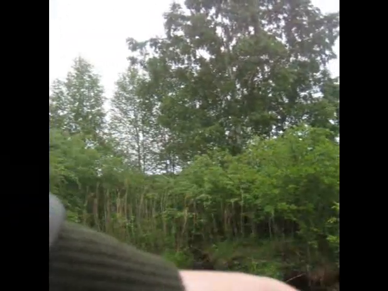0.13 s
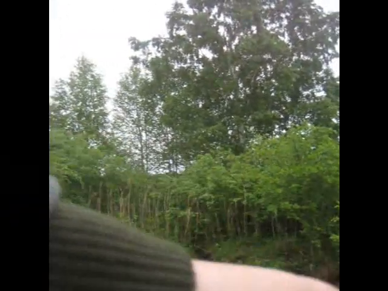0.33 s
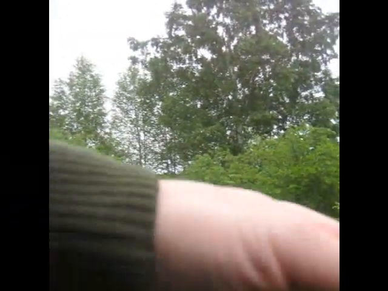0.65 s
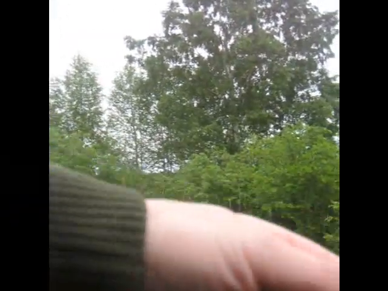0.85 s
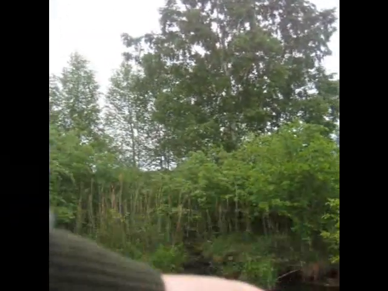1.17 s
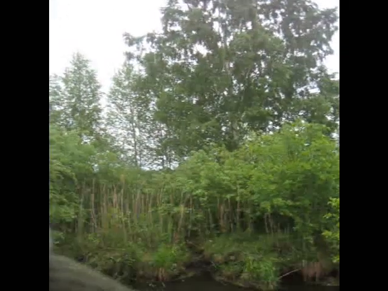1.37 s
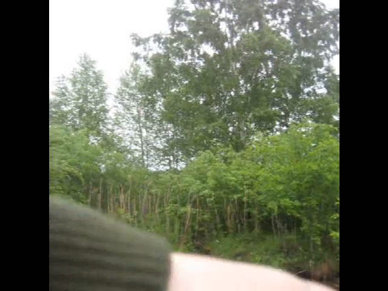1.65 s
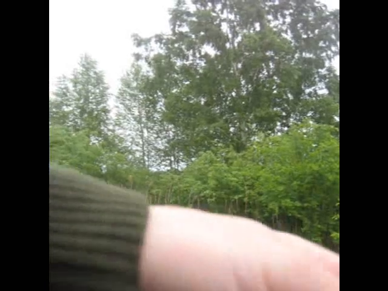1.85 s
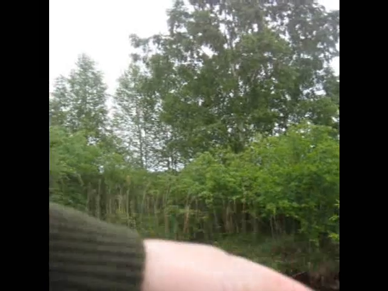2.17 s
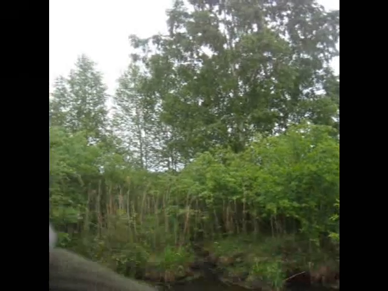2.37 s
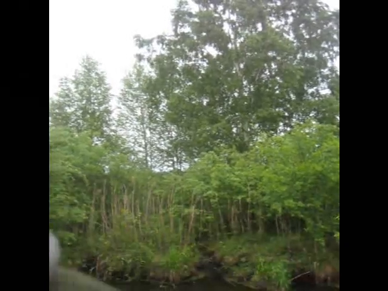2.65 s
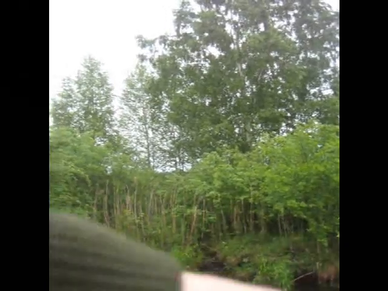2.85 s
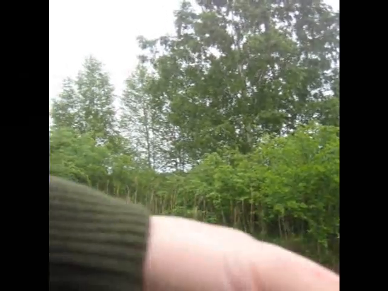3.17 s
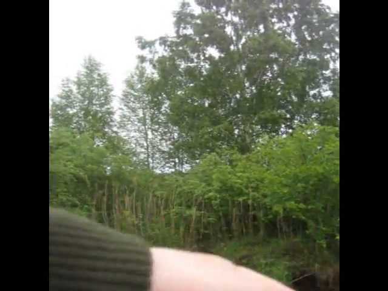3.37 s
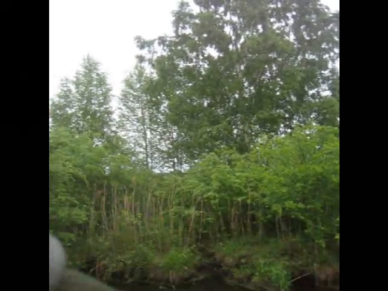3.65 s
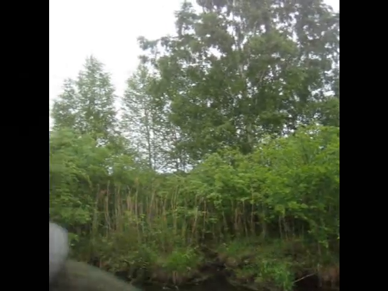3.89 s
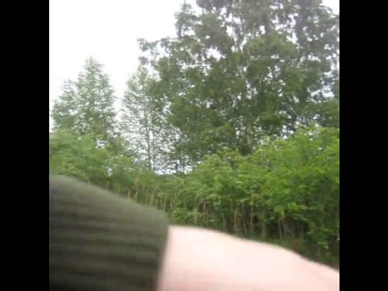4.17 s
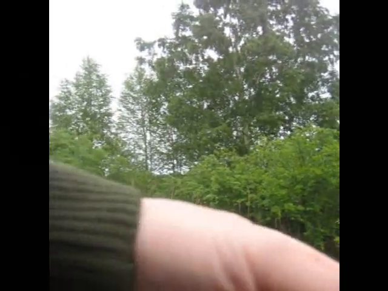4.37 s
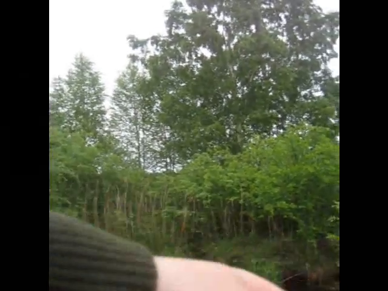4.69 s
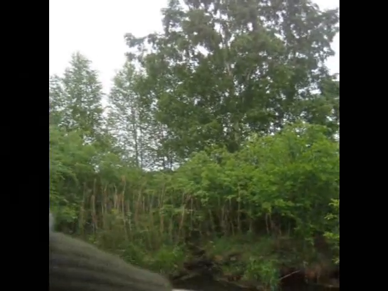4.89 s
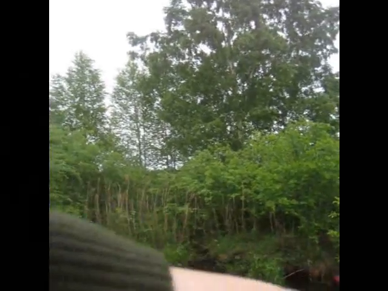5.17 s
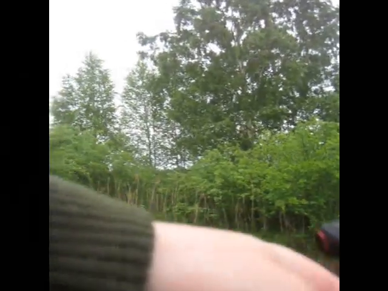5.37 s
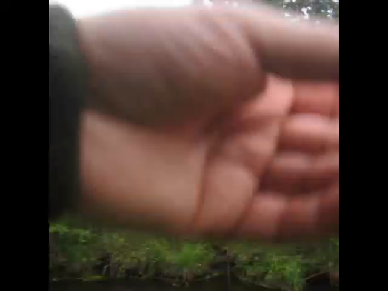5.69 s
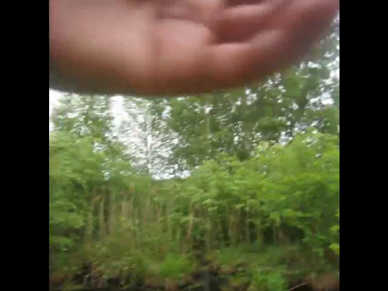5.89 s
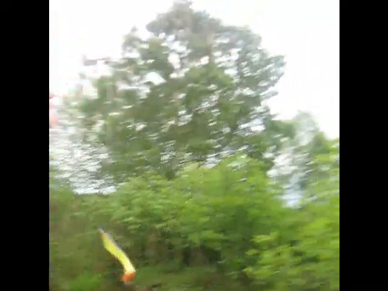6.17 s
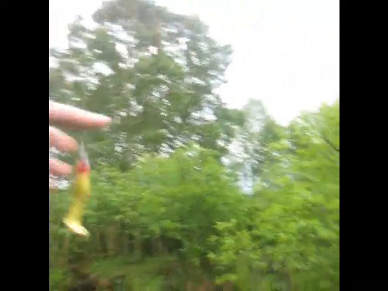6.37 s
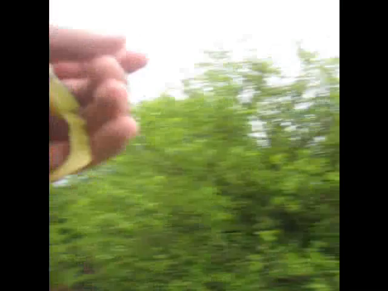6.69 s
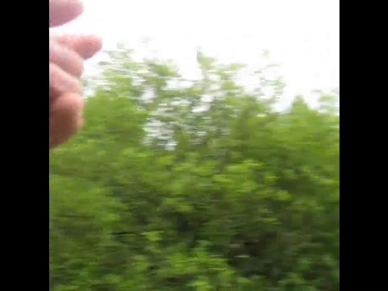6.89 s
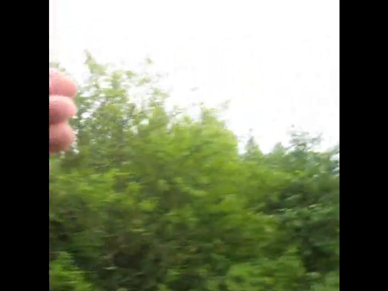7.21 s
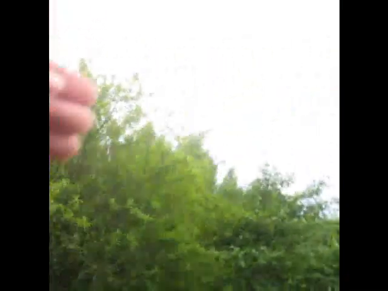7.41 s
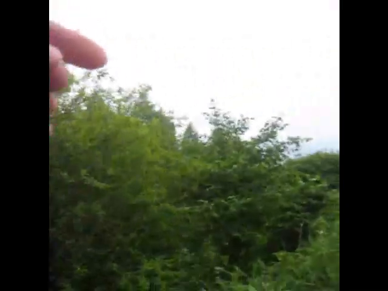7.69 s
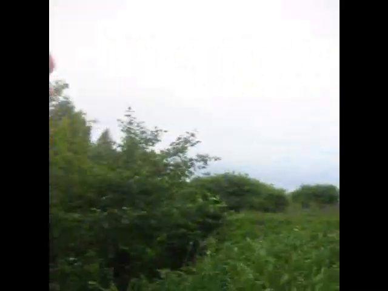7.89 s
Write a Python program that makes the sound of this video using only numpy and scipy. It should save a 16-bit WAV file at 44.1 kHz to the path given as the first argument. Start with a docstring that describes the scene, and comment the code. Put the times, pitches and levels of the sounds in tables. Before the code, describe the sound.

Wild songbirds whistle, buzz and trill over a marsh with faint hiss, then a sleeve and hands rub and knock the small camera.

```python
"""Songbirds whistle, buzz and trill around a marsh, and one long whistle falls slowly.
Far birds and hiss lie behind them; later, a sleeve and hands rub and knock the camera body.
Bird notes are tones that follow pitch curves, with noise-like echoes from the bushes.
Hiss, rubbing and leaves are filtered noise; knocks are short pushes that make the shell ring.
The small camera has one microphone, so both channels are the same."""
import sys
import numpy as np
from scipy import signal
from scipy.fft import rfft, irfft
from scipy.io import wavfile
from scipy.ndimage import uniform_filter1d

SR = 44100
rng = np.random.default_rng(int(sys.argv[2]) if len(sys.argv) > 2 else 0)


def file_out(sig):
    """Save sig as 16-bit WAV at sys.argv[1]."""
    # one column per channel
    cols = np.atleast_2d(sig).T
    # limit, then scale
    lim = np.clip(cols, -1, 1)
    pcm = np.round(lim * 32767).astype(np.int16)
    wavfile.write(sys.argv[1], SR, pcm)


N = 355005
T = np.arange(N) / SR  # time in seconds

# Note levels below are for the start of a note, before its fade, flutter and echoes.

# Steady hiss. Each row: frequency in Hz, relative strength per Hz in dB.
HISS_COLOUR = [(25, -8), (60, -2.5), (430, -1.5), (1450, -3), (3070, -3.5), (6340, -2.5), (8760, -11.5),
               (13000, -14), (14800, -12.5)]
HISS_DB = -45
# Thin whine of the camera electronics. Each row: frequency in Hz, level in dB.
WHINE_TONES = [(7560, -67)]

# Loudness of the far birds with their echoes. Each row: time in seconds, level in dB.
CHORUS_LEVEL = [(0, -44), (1.5, -43.5), (3.7, -47), (4.3, -52), (6.2, -50), (6.5, -51.5), (8.05, -41)]

# Echoes: a short one from the bushes and a longer, weaker one from the tree line.
BUSH_T60_S, BUSH_DB = 0.24, -6  # time to fade by 60 dB; level sent from the near birds
FAR_T60_S, FAR_DB = 1.1, -13  # time to fade by 60 dB; start level against the bush echo

# Cloth and skin sliding on the camera.
# Each row: time in seconds, scratch level in dB, body rumble level in dB.
RUB_LEVELS = [(5.5, -56, -68), (5.72, -52, -53.5), (6.27, -47, -48.5), (6.43, -37.5, -45), (6.55, -45, -49),
              (7.0, -46, -51.5), (7.1, -40, -45.5), (7.18, -42.5, -46), (7.23, -56, -57), (7.3, -34, -44),
              (7.36, -27, -37), (7.42, -31, -38.5), (7.47, -49, -45), (7.56, -41.5, -41.5),
              (7.655, -29, -46), (7.72, -36, -39), (7.8, -36, -40), (7.85, -44.5, -42), (7.96, -46, -47),
              (8.04, -36, -38)]
# Tone of the scratch. Each row: frequency in Hz, relative strength per Hz in dB.
SCRATCH_COLOUR = [(700, -10), (1300, -1.5), (2400, -1), (7300, -3.5), (15000, -18)]
# Tone of leaves brushing past. Each row: frequency in Hz, relative strength per Hz in dB.
LEAF_TONE = [(1100, -15), (1900, 5), (2600, -7), (4500, -19)]
LEAF_S, LEAF_LENGTH_S, LEAF_DB = 5.74, 0.28, -47  # start, length, level at the middle

# Blows on the camera. Each row: time of the push in seconds, height of the push in dB,
# contact time in ms, how freely the shell rings in dB.
KNOCK_BLOWS = [(4.515, -17.5, 0.04, -52), (5.533, -20, 0.027, -57), (5.897, -23, 0.032, -41),
               (6.7138, -8, .12, -58), (6.744, -10.5, .1, -58), (7.66, -41, 0.17, -7.5),
               (7.674, -35.5, 0.23, -17)]
# Ways the shell rings. Each row: frequency in Hz, strength in dB, time to fade by 60 dB in seconds.
SHELL_MODES = [(731, 5.5, 0.14), (806, 10.5, 0.088)]
REBOUND_HZ, REBOUND_T60_S = 356, 0.0091

# Pitch of the long whistle. One row: top in Hz, bottom in Hz, time constant of the fall in seconds.
LONG_WHISTLE_PITCH = (6960, 5275, .14)
# Loudness of the long whistle before its steady fade. Each row: time in seconds, level in dB.
LONG_WHISTLE_LEVEL = [(4.548, -46), (4.586, -28.5), (4.79, -28), (4.86, -34.5), (5.08, -42), (5.23, -56)]
# Brief dips that stand for the tone cancelling against its echoes. Each entry: time in seconds.
LONG_WHISTLE_DIPS = [4.701, 4.74, 4.897, 4.95]
DIP_S, DIP_DB = 0.006, -20  # width and depth of those dips
LONG_ECHO_DB = -9

# Rasping notes, the pitch shaking too fast to follow.
# Each row: start in seconds, length in seconds, centre pitch in Hz, level in dB.
BUZZ_NOTES = [(0.189, 0.055, 2810, -41), (0.227, 0.056, 2747, -38), (0.357, 0.037, 2743, -38),
              (0.411, 0.037, 2690, -37), (0.68, 0.027, 2720, -35.5), (0.852, 0.038, 2660, -37.5),
              (0.842, 0.076, 4510, -41.5), (1.088, 0.1, 2950, -44.5), (1.11, 0.077, 4610, -42),
              (1.253, 0.25, 5460, -47), (1.387, 0.13, 2903, -45.5), (1.4, 0.1, 4560, -46),
              (1.517, 0.16, 5490, -46.5), (1.839, 0.18, 5820, -45.5), (2.13, 0.22, 3720, -43),
              (2.317, 0.076, 2940, -40), (3.12, 0.13, 6110, -43.5), (3.387, 0.13, 3460, -43),
              (4.885, 0.095, 3140, -47)]
# Broad rattles with a wider shake.
# Each row: start in seconds, length in seconds, centre pitch in Hz, level in dB.
RATTLE_NOTES = [(.0, 0.052, 3430, -41.5), (0.562, 0.16, 3530, -43), (2.503, 0.19, 4810, -45),
                (2.712, 0.27, 4600, -40.5), (6.369, 0.21, 5520, -33)]
# Dry ticks of a few shakes. Each row: start in seconds, centre pitch in Hz, level in dB.
TICK_NOTES = [(0.633, 2510, -40), (.658, 2600, -42), (0.802, 2600, -40.5), (.828, 2525, -39),
              (1.725, 3120, -41), (1.758, 2380, -43), (2.61, 3250, -41.5), (2.652, 3180, -38),
              (3.311, 4020, -42)]
TICK_S = 0.018
SHAKE_HZ = 172.9  # average number of shakes per second
BUZZ_SWING_HZ, RATTLE_SWING_HZ, TICK_SWING_HZ = 328, 681, 420
SHAKE_PULSE_DB = 2.5  # each shake is also a throb
# Harsh churrs of separate pulses.
# Each row: start in seconds, length in seconds, centre pitch in Hz, level at the end in dB.
CHURR_NOTES = [(2.798, .11, 2520, -32.5), (3.051, .1, 2480, -32.5)]
CHURR_PER_S, CHURR_SWELL_DB = 86, 7  # pulses per second; rise in level to the end
CHURR_SWING_HZ = 900  # each pulse falls from this far above the centre to this far below

# Held notes. Each row: start in seconds, length in seconds, pitch in Hz, level in dB.
HELD_NOTES = [(0.373, .03, 3860, -39.5), (0.373, 0.02, 4510, -42), (0.727, 0.1, 3020, -43.5),
              (1.218, 0.16, 6030, -43), (1.52, 0.19, 5780, -54), (1.54, 0.11, 3540, -40.5),
              (1.83, 0.13, 5580, -44), (1.998, 0.16, 4370, -40), (2.072, 0.18, 4820, -47.5),
              (2.319, 0.11, 2767, -45), (2.72, 0.16, 5180, -48), (3.084, 0.22, 4720, -48.5),
              (3.128, 0.16, 6650, -43.5), (3.326, .012, 3450, -41), (3.435, 0.039, 2740, -44),
              (3.591, .02, 2670, -47), (3.855, 0.12, 5880, -53), (4.041, 0.037, 2910, -44.5),
              (4.823, .05, 3020, -48), (5.666, 0.063, 2155, -45.5), (6.29, .04, 5130, -42.5),
              (6.34, 0.035, 5500, -37.5), (6.362, 0.17, 6035, -35.5), (7.001, 0.027, 5400, -22.5),
              (7.033, 0.2, 5350, -44), (7.074, 0.02, 3200, -28), (7.997, 0.02, 3930, -38)]
HELD_WANDER = 0.004  # typical drift, as a share of the pitch
# Sliding notes, quick at first and then levelling off.
# Each row: start in seconds, length in seconds, start pitch in Hz, end pitch in Hz, level in dB.
SLIDE_NOTES = [(.005, 0.07, 4590, 4240, -44), (.1, .012, 4370, 4950, -39), (0.109, 0.015, 3550, 3100, -37),
               (0.134, 0.016, 3250, 4100, -35.5), (0.227, 0.076, 3240, 3960, -38),
               (0.249, 0.026, 3080, 3610, -36), (0.322, 0.011, 3280, 4080, -37),
               (0.356, 0.024, 2990, 3800, -35.5), (0.482, 0.029, 5230, 4780, -40.5),
               (0.597, 0.026, 3490, 3050, -40), (0.997, 0.12, 3170, 3480, -49),
               (1.2, 0.082, 4440, 3750, -47.5), (2.112, 0.047, 4420, 3410, -40),
               (2.258, 0.049, 3710, 3410, -39.5), (2.905, 0.085, 3010, 3360, -40),
               (3.18, 0.062, 3610, 3050, -43), (3.392, 0.025, 4000, 4430, -39.5),
               (3.414, 0.03, 3280, 3980, -39), (3.433, 0.054, 4300, 4050, -43.5),
               (3.594, 0.018, 3300, 3700, -43), (3.67, 0.017, 4000, 4540, -39.5),
               (3.682, 0.034, 3390, 3910, -33.5), (3.714, .04, 3030, 2820, -47),
               (3.72, .032, 4600, 4170, -44), (4.035, 0.043, 4220, 4350, -42),
               (4.073, 0.056, 3340, 3590, -45), (4.277, 0.023, 3660, 3450, -43.5),
               (5.419, 0.024, 2950, 3800, -43), (5.52, 0.016, 3050, 3770, -45),
               (5.702, .025, 3740, 3170, -45), (5.747, 0.019, 3720, 3150, -39.5),
               (5.801, 0.031, 3820, 3360, -41), (5.989, 0.027, 3840, 3430, -40.5),
               (6.083, 0.011, 3800, 3260, -35.5), (6.128, 0.026, 4100, 3270, -39),
               (6.312, 0.048, 3620, 3220, -42.5), (6.302, .012, 5030, 4050, -35),
               (6.312, 0.036, 4040, 4900, -36.5), (6.41, 0.12, 2960, 3200, -43),
               (6.413, 0.032, 5250, 4780, -30), (6.508, 0.052, 4010, 3840, -32.5),
               (6.555, 0.014, 3900, 4750, -25), (6.563, 0.043, 4860, 4530, -26.5),
               (6.607, 0.025, 2710, 2950, -45), (6.662, 0.027, 6500, 4270, -26.5),
               (6.682, 0.052, 4360, 3720, -28.5), (6.761, 0.039, 4050, 4780, -29),
               (6.895, 0.02, 2960, 3500, -34.5), (6.904, 0.025, 3700, 4260, -33),
               (6.917, 0.028, 2010, 3000, -41), (6.925, 0.027, 4030, 3200, -30),
               (6.984, 0.0086, 4440, 4970, -21), (6.992, 0.009, 4620, 5600, -23),
               (7.025, 0.0084, 5420, 4430, -22.5), (7.083, 0.017, 3600, 4230, -29),
               (7.088, 0.024, 2030, 2630, -47), (7.105, 0.02, 4150, 3160, -31),
               (7.226, 0.01, 4020, 4540, -33), (7.235, 0.0074, 4420, 3570, -23.5),
               (7.424, 0.18, 3040, 2780, -37), (7.663, 0.024, 5460, 3650, -29),
               (7.741, 0.029, 3680, 3450, -29), (7.761, 0.067, 3450, 3200, -22.5)]
EASE_PER_S, EASE_MOST = 44.9, 3.4  # levelling off grows with length, up to a limit
# Arched notes, up and down again.
# Each row: start in seconds, length in seconds, top pitch in Hz, level in dB.
ARCH_NOTES = [(1.353, 0.07, 3350, -46), (1.843, 0.13, 3550, -42.5), (1.931, 0.098, 4430, -38.5),
              (4, 0.049, 3610, -41), (4.861, 0.083, 3430, -46), (5.255, 0.061, 2320, -46.5),
              (5.434, 0.044, 2320, -45.5)]
ARCH_START, ARCH_END = 0.0945, 0.072  # drop below the top at each end, as a share of the pitch
# Slow, clear warbles. Each row: start in seconds, length in seconds, start pitch in Hz, end pitch in Hz,
# swing to each side in Hz, turns per second, level in dB, change of level in dB per second.
WARBLE_NOTES = [(6.781, 0.076, 4380, 4304, 570, 53, -26.5, -7),
                (7.246, 0.058, 3544, 2930, 517, 43, -27.5, -130)]
WARBLE_TOP_DB = 3.5  # louder at the top of each turn
WARBLE_LEAD_S, WARBLE_SKEW = 0.006, 0.3  # time to the first top; falls quicker than rises
# Low trill, each syllable a held note with a dip in pitch. Each row: start in seconds, level in dB,
# time to the bottom of the dip in seconds, change of level there in dB.
TRILL_SYLLABLES = [(2.6, -37.5, 0.041, -9), (2.683, -36, 0.038, -17), (2.803, -43, 0.036, 1),
                   (2.89, -42.5, .038, 0), (3.003, -39.5, .038, 4), (3.098, -46, 0.042, 9),
                   (3.2, -40, 0.04, 2), (3.305, -39, 0.044, -4), (3.41, -39, .045, 1),
                   (3.51, -38, 0.038, -2), (3.615, -36.5, 0.042, -2), (3.715, -36, 0.025, -7)]
TRILL_HZ, TRILL_DROP_HZ, TRILL_SAG_HZ_PER_S = 2104, 253, 59.7  # first pitch, dip, slow sinking
TRILL_S, TRILL_LINK_DB = 0.13, -14  # syllable length; level change after the dip

TOP_HZ = 15450  # the camera cuts sounds above this


def amp(db):
    """Gain of a level in dB."""
    return 10 ** (np.asarray(db) / 20)


def unit(x):
    """Scales a sound to an average strength (rms) of 1."""
    return x / np.sqrt(np.mean(x ** 2))


def coloured(x, points):
    """Filters a sound by a (Hz, dB) curve and scales it to rms 1."""
    hz, db = np.transpose(points)
    bins = np.arange(len(x) // 2 + 1) * SR / len(x) + 1
    gain = amp(np.interp(np.log(bins), np.log(hz), db))
    return unit(irfft(rfft(x) * gain, len(x)))


def walk(rate):
    """Smooth random curve with rms 1, given a new random value `rate` times a second."""
    k = int(SR / rate)
    steps = np.repeat(rng.standard_normal(N // k + 1), k)
    smooth = uniform_filter1d(uniform_filter1d(steps, k), k)
    return unit(smooth[:N])


def add(out, s, sound):
    """Mixes a sound in at s seconds."""
    i = int(s * SR)
    out[i:i + len(sound)] += sound[:N - i]


def sing(hz, db, edge_s=0.006, fade_db=-25, rough=0.43, flutter_s=0.003, tail=0.25):
    """A syrinx (bird voice) tone with soft edges; random flutter stands for close echoes from twigs."""
    t = np.arange(len(hz)) / SR
    rise = t / edge_s
    fall = (t[-1] - t) / max(edge_s, t[-1] * tail)
    shape = np.clip(np.minimum(rise, fall), 0, 1) * amp(db + fade_db * t)  # fade in dB per second
    knots = np.arange(0, t[-1] + 2 * flutter_s, flutter_s)
    a, b = (np.interp(t, knots, rng.standard_normal(len(knots))) for _ in range(2))
    flutter = 1 + rough * (a + 1j * b)  # shakes both loudness and phase
    tone = np.exp(2j * np.pi * np.cumsum(hz) / SR)
    return np.sqrt(2) * shape * np.imag(flutter * tone)


def hiss():
    """Noise of air and preamplifier, nearly steady, with a thin whine."""
    out = coloured(rng.standard_normal(N), HISS_COLOUR) * amp(HISS_DB + 0.5 * walk(2.61))
    for hz, db in WHINE_TONES:
        out += amp(db) * np.sqrt(2) * np.sin(2 * np.pi * hz * T)
    return out


def chorus(count=1500):
    """Many short random chirps of far birds, mostly low in their pitch range."""
    out = np.zeros(N)
    for when, stretch, pitch, slide, loud in rng.random((count, 5)):
        start_hz = 2600 * 2 ** (1.25 * pitch ** 2.6)
        end_hz = start_hz + 2400 * (slide - 0.5)
        track = np.linspace(start_hz, end_hz, int((0.01 + 0.022 * stretch) * SR))
        add(out, when * N / SR, sing(track, 9 * loud - 3 * pitch, rough=0.75))
    return out


def bushes(x):
    """Echoes from leaves and trunks: a fading noise tail whose level wavers as the leaves move."""
    t = T[:SR]
    fading = amp(-60 * t / BUSH_T60_S) + amp(FAR_DB - 60 * t / FAR_T60_S)
    tail = rng.standard_normal(SR) * fading * np.clip(t / 0.012, 0, 1)
    echoes = signal.fftconvolve(x, tail / np.sqrt(np.sum(tail ** 2)))[:N]
    return echoes * unit(1 + walk(90))


def rubbing():
    """Fibres slip in dense clicks of uneven size; the shell adds a duller rumble, and leaves brush past."""
    s, scratch_db, rumble_db = np.transpose(RUB_LEVELS)
    sizes = np.minimum(rng.exponential(size=(2, N)), 7)
    slips = rng.standard_normal((2, N)) * amp(1.9 * sizes)
    scratch = coloured(slips[0], SCRATCH_COLOUR)
    scratch *= amp(np.interp(T, s, scratch_db, left=-90) + 2.0 * walk(20))
    rumble_colour = [(60, -26.5), (300, -3.5), (900, 2.5), (2200, -10.0), (5000, -31)]  # Hz, dB per Hz
    rumble = coloured(slips[1], rumble_colour)
    sweep = np.sin(np.pi * np.clip((T - LEAF_S) / LEAF_LENGTH_S, 0, 1))
    leaves = coloured(slips[1][::-1], LEAF_TONE) * amp(LEAF_DB) * sweep
    rumble *= amp(np.interp(T, s, rumble_db, left=-90) + 1.2 * walk(25))
    return scratch + rumble + leaves


def knocks():
    """A short push on the capsule, its quick rebound and the shell's ring; softer contact pushes longer."""
    out, t = np.zeros(N), T[:SR // 10]
    rebound = -0.07 * amp(-60 * t / REBOUND_T60_S) * np.sin(2 * np.pi * REBOUND_HZ * t)
    ring = sum(amp(db - 60 * t / t60) * np.sin(2 * np.pi * hz * t) for hz, db, t60 in SHELL_MODES)
    for s, db, contact_ms, ring_db in KNOCK_BLOWS:
        # the push peaks two contact times in, so it is mixed in that much earlier
        push = -amp(db) * np.exp(-((t * 1000 - 2 * contact_ms) / (0.5 * contact_ms)) ** 2)
        answer = np.convolve(push, rebound + amp(ring_db) * ring)[:len(t)]
        add(out, s - contact_ms / 500, push + answer)
    return signal.sosfilt(signal.butter(2, 70, "high", fs=SR, output="sos"), out)


def long_whistle():
    """A long tone whose pitch falls fast at first, then eases towards the bottom."""
    out = np.zeros(N)
    top_hz, bottom_hz, ease_s = LONG_WHISTLE_PITCH
    s, db = np.transpose(LONG_WHISTLE_LEVEL)
    t = T[:int((s[-1] - s[0]) * SR)]
    clock = t + s[0]
    dips = sum(DIP_DB * np.exp(-((clock - at) / DIP_S) ** 2) for at in LONG_WHISTLE_DIPS)
    level_db = np.interp(clock, s, db) + dips
    track = bottom_hz + (top_hz - bottom_hz) * np.exp(-t / ease_s)
    add(out, s[0], sing(track, level_db, fade_db=-2.5, rough=0.36, flutter_s=0.006, tail=0.02))
    return out


def buzzers():
    """Fast uneven pitch shakes make buzzes, rattles and ticks; falling pulses make churrs."""
    out, uneven = np.zeros(N), walk(250)
    notes = [row + (BUZZ_SWING_HZ,) for row in BUZZ_NOTES]
    notes += [row + (RATTLE_SWING_HZ,) for row in RATTLE_NOTES]
    notes += [(s, TICK_S, hz, db, TICK_SWING_HZ) for s, hz, db in TICK_NOTES]
    for s, length, hz, db, swing_hz in notes:
        wobble = 0.4 * uneven[int(s * SR):][:int(length * SR)]
        turn = 2 * np.pi * np.cumsum(SHAKE_HZ * (1 + wobble)) / SR
        track = hz + swing_hz * (np.cos(turn) + wobble)
        throb_db = db + SHAKE_PULSE_DB * np.sin(turn)
        add(out, s, sing(track, throb_db, edge_s=max(0.0045, 0.055 * length), rough=0.52))
        if 2600 < hz < 2750:  # low rasps are overtones of a weak, steady tone an octave down
            add(out, s, sing(hz / 2 + 0 * track, db - 15))
    for s, length, hz, db in CHURR_NOTES:
        t = T[:int(length * SR)]
        cycle = (t * CHURR_PER_S + 0.5) % 1 - 0.5  # -0.5 to 0.5 in each pulse, loudest at 0
        pulse_db = -100 * cycle ** 2 + CHURR_SWELL_DB * (t / length - 1)
        track = hz - 2 * CHURR_SWING_HZ * cycle
        add(out, s, sing(track, db + pulse_db, fade_db=0, rough=0.5, flutter_s=0.002, tail=0.02))
    return out


def clear_notes():
    """Held, sliding and arched whistles, each a single tone along a simple pitch curve."""
    out, notes = np.zeros(N), []
    drift = 1 + HELD_WANDER * walk(40)
    for s, length, hz, db in HELD_NOTES:
        notes.append((s, hz * drift[int(s * SR):][:int(length * SR)], db))
    for s, length, start_hz, end_hz, db in SLIDE_NOTES:
        ease = min(EASE_PER_S * length, EASE_MOST)
        progress = np.expm1(-ease * np.linspace(0, 1, int(length * SR))) / np.expm1(-ease)
        notes.append((s, start_hz + (end_hz - start_hz) * progress, db))
    for s, length, top_hz, db in ARCH_NOTES:
        u = 2 * np.linspace(0, 1, int(length * SR)) - 1  # 0 at the top of the arch
        notes.append((s, top_hz * (1 - np.where(u < 0, ARCH_START, ARCH_END) * u ** 2), db))
    for s, track, db in notes:
        # a long note meets its own echoes, a quick one is over before they arrive
        rough = np.clip(6 * len(track) / SR, 0.42, 0.95)
        add(out, s, sing(track, db, rough=rough, flutter_s=0.0036, tail=0.4))
    return out


def warbles():
    """Clear tones whose pitch swings up and down, louder at each top."""
    out = np.zeros(N)
    for s, length, start_hz, end_hz, swing_hz, rate, db, fade_db in WARBLE_NOTES:
        t = T[:int(length * SR)]
        phase = 2 * np.pi * rate * (t - WARBLE_LEAD_S)
        turn = np.cos(phase + WARBLE_SKEW * (1 - np.cos(phase)))
        track = np.linspace(start_hz, end_hz, len(t)) + swing_hz * turn
        add(out, s, sing(track, db + WARBLE_TOP_DB * turn, fade_db=fade_db, rough=0.5))
    return out


def trill():
    """A row of low notes, each with a quick dip in pitch, sinking slowly from one to the next."""
    out, t = np.zeros(N), T[:int(TRILL_S * SR)]
    for s, db, dip_s, dip_db in TRILL_SYLLABLES:
        dip = np.exp(-((t - dip_s) / 0.0085) ** 2)
        # a faint thread leads on to the next syllable
        fading = TRILL_LINK_DB * np.clip((t - dip_s) / 0.022, 0, 1)
        sag_hz = TRILL_SAG_HZ_PER_S * (s - TRILL_SYLLABLES[0][0])
        track = TRILL_HZ - sag_hz - TRILL_DROP_HZ * dip
        level_db = db + dip_db * dip + fading
        add(out, s, sing(track, level_db, edge_s=0.004, rough=0.15, flutter_s=0.0054))
    return out


def scene():
    """Near birds arrive mostly direct; far birds are about half direct, half scattered."""
    near = clear_notes() + warbles() + trill() + buzzers()
    falling, far = long_whistle(), chorus()
    far = unit(0.96 * far + bushes(far)) * amp(np.interp(T, *np.transpose(CHORUS_LEVEL)))
    echoes = bushes(amp(BUSH_DB) * near + amp(LONG_ECHO_DB) * falling)
    birds = near + falling + echoes + far
    return np.tile(birds + rubbing() + knocks() + hiss(), (2, 1))


def record(dry):
    """The camera cuts the highest treble with a steep filter."""
    return signal.sosfilt(signal.ellip(10, 0.2, 80, TOP_HZ, fs=SR, output="sos"), dry)


dry = scene()
out = record(dry)
file_out(out)
```